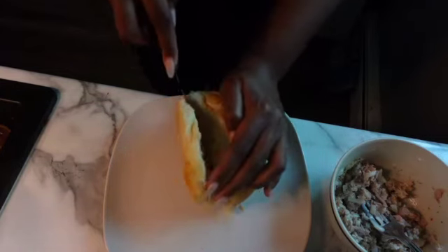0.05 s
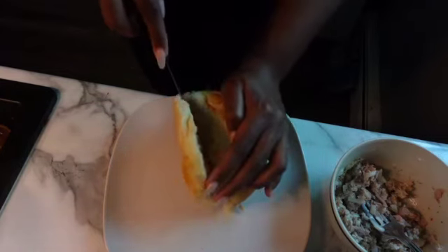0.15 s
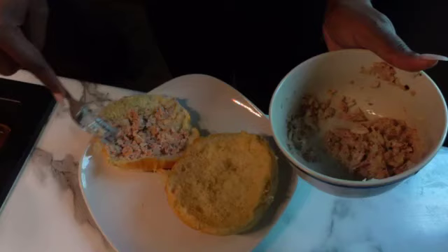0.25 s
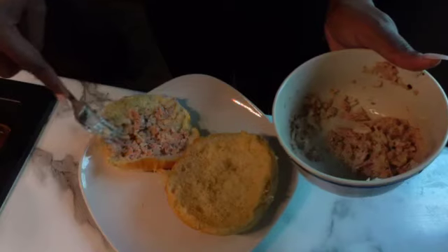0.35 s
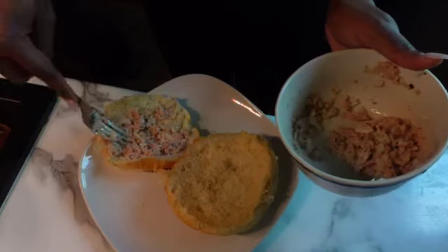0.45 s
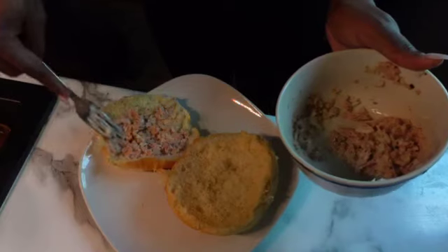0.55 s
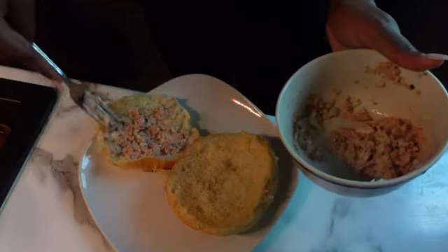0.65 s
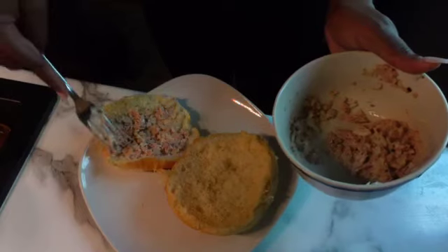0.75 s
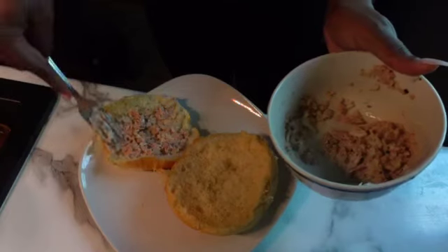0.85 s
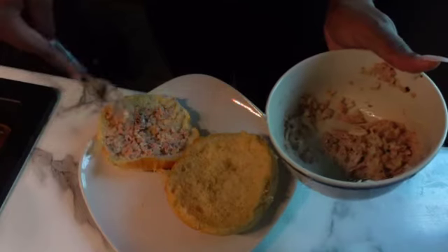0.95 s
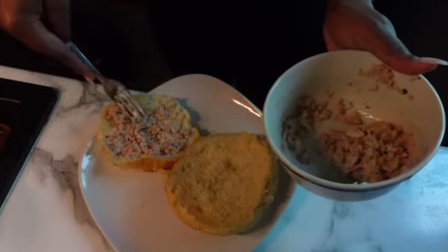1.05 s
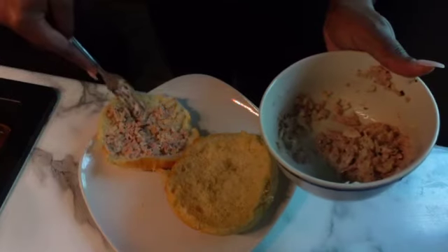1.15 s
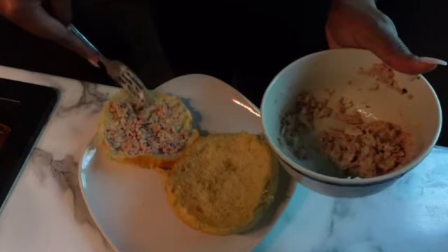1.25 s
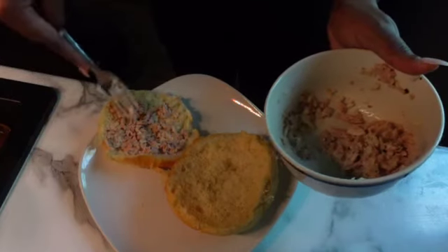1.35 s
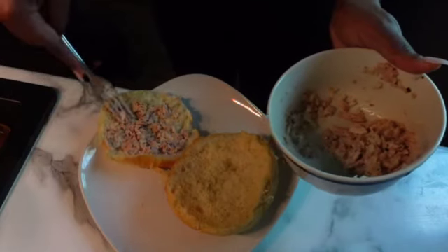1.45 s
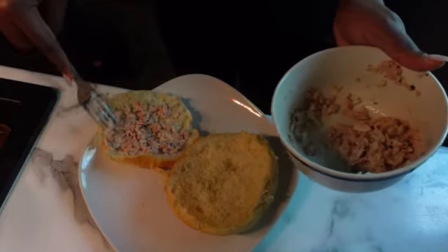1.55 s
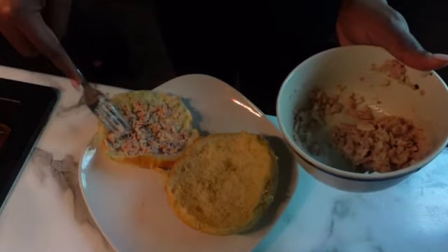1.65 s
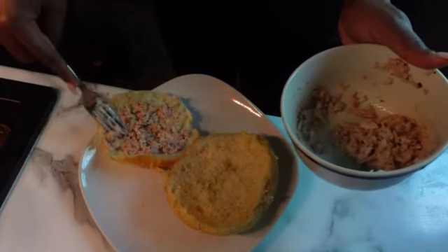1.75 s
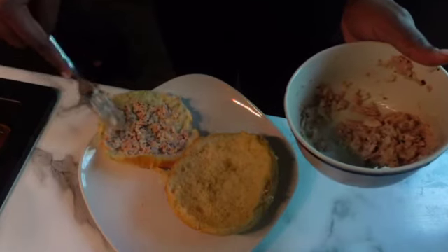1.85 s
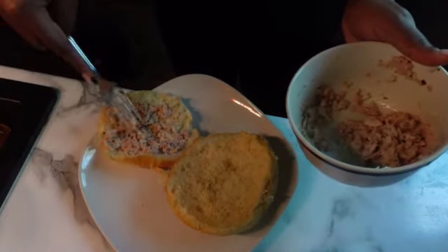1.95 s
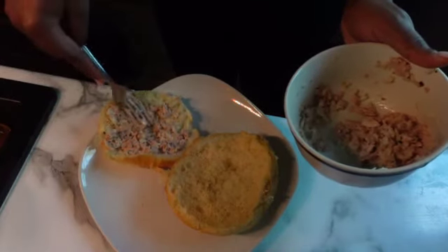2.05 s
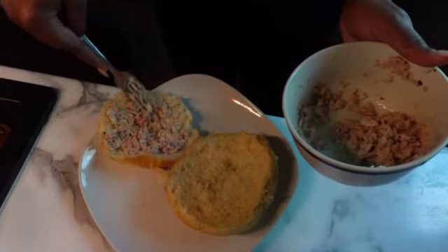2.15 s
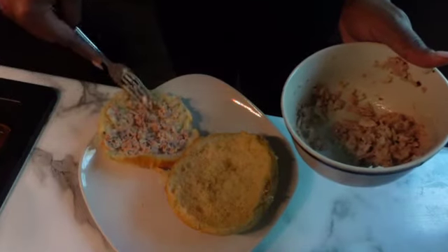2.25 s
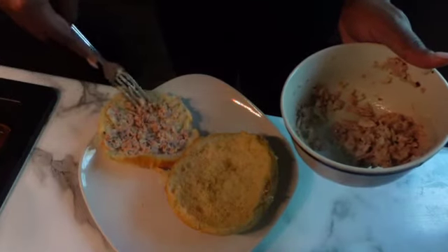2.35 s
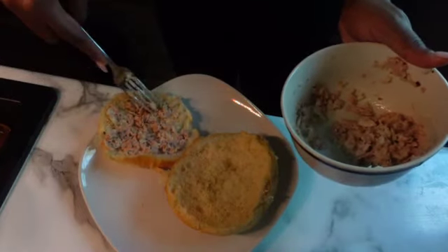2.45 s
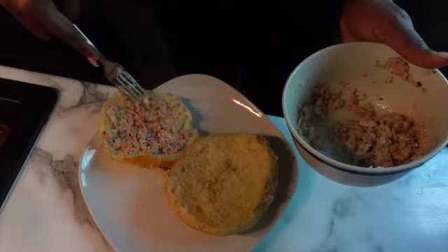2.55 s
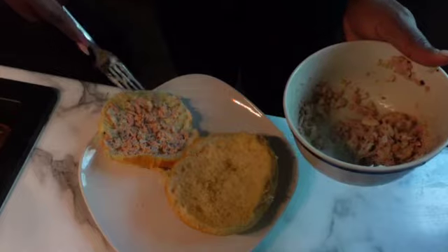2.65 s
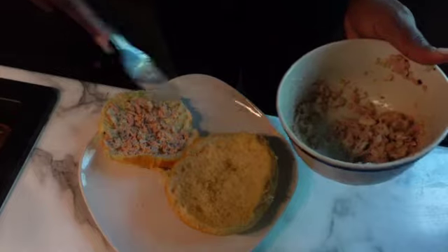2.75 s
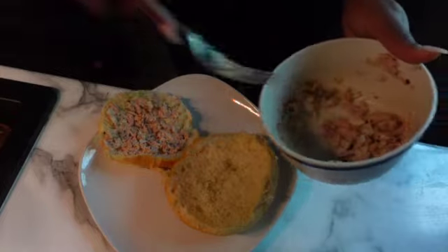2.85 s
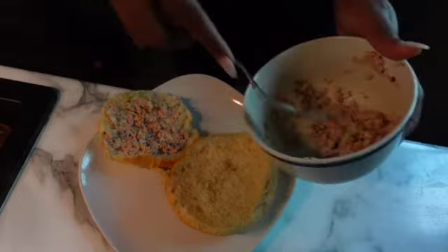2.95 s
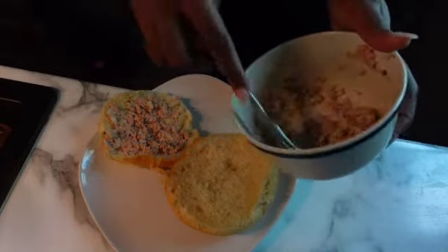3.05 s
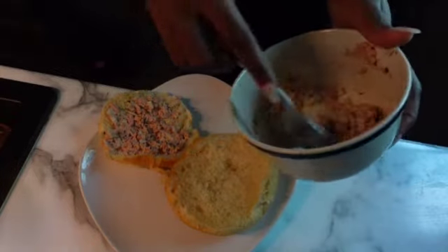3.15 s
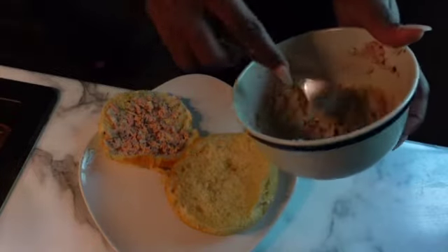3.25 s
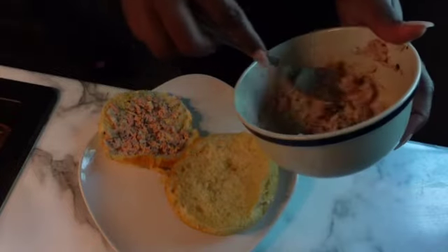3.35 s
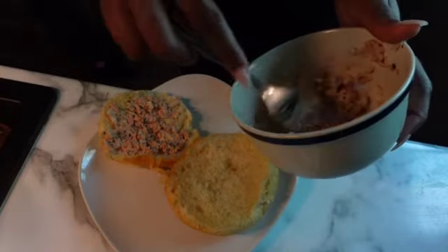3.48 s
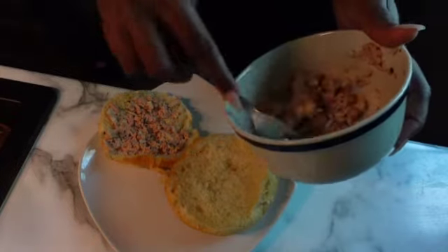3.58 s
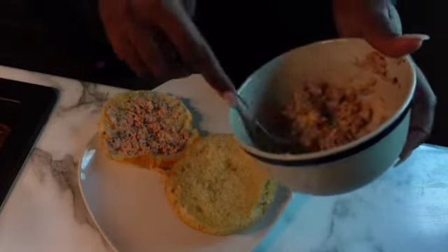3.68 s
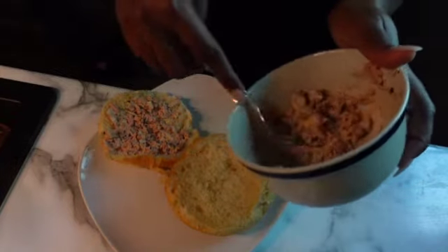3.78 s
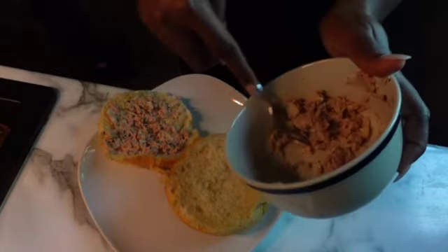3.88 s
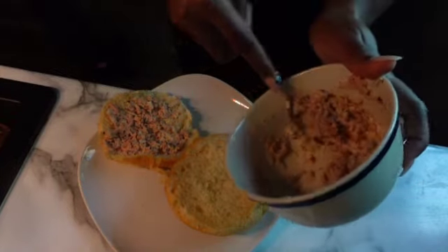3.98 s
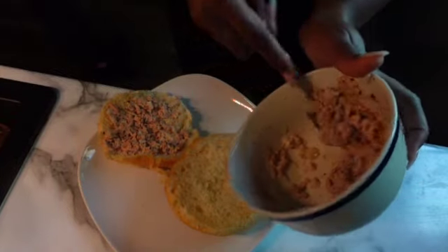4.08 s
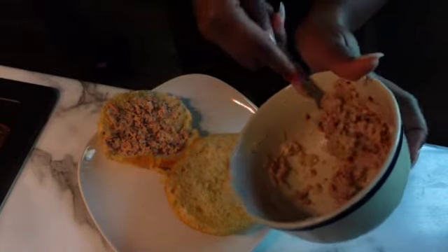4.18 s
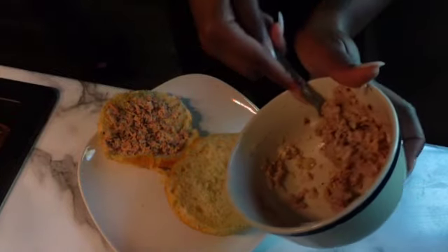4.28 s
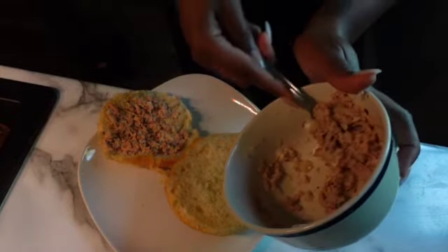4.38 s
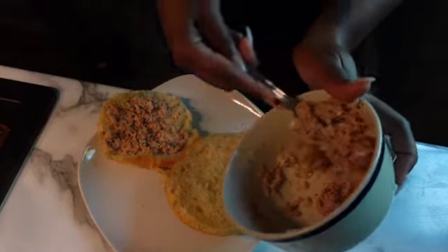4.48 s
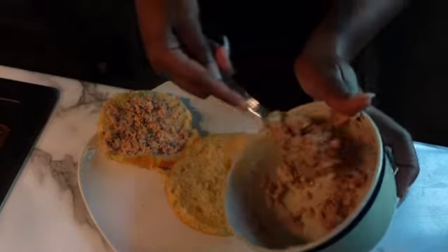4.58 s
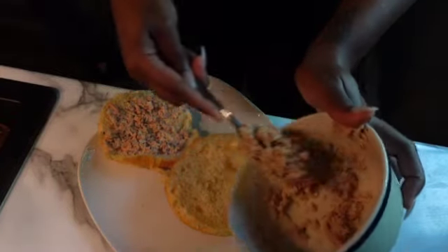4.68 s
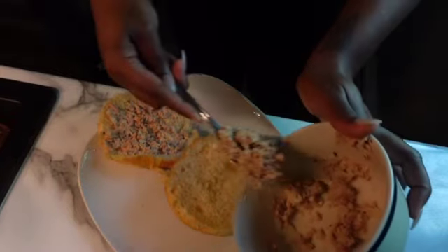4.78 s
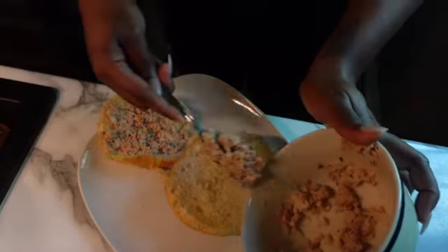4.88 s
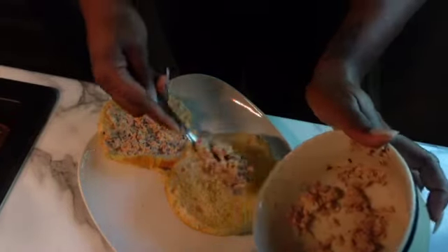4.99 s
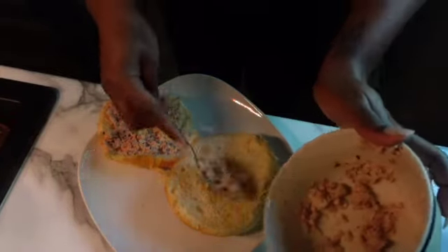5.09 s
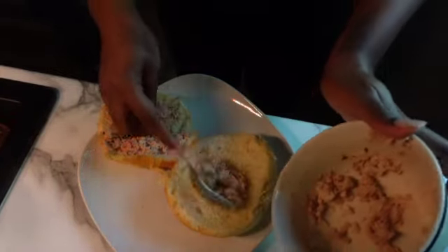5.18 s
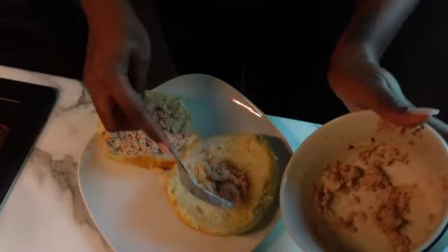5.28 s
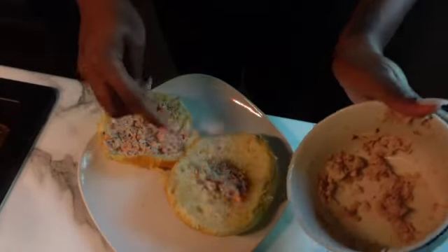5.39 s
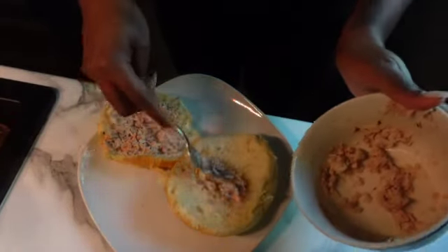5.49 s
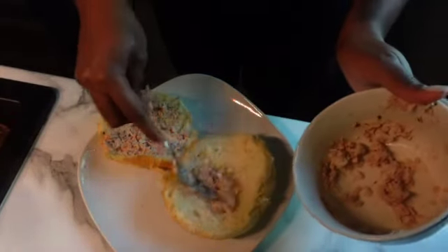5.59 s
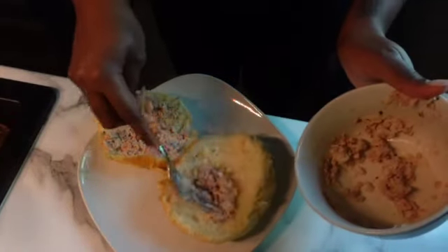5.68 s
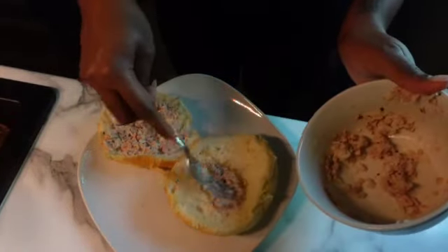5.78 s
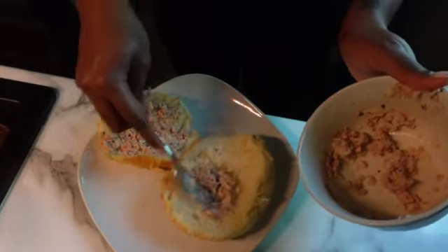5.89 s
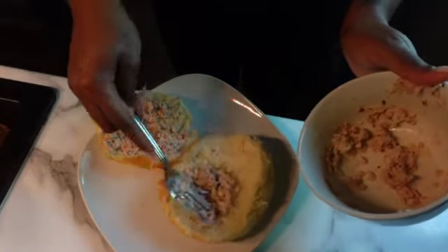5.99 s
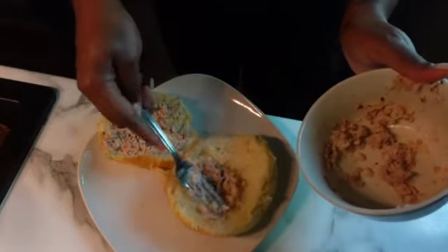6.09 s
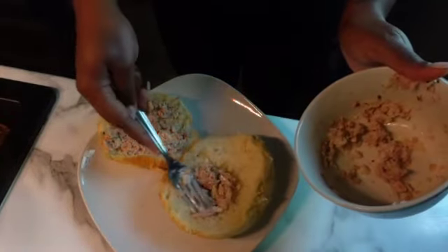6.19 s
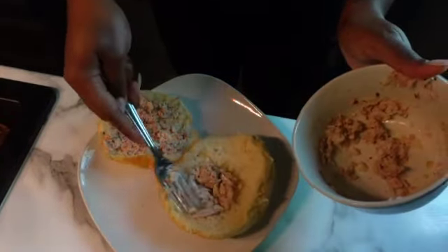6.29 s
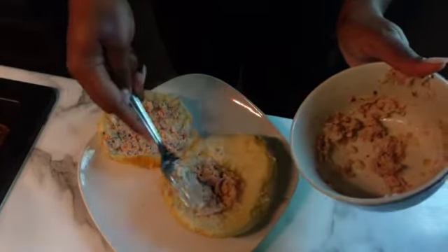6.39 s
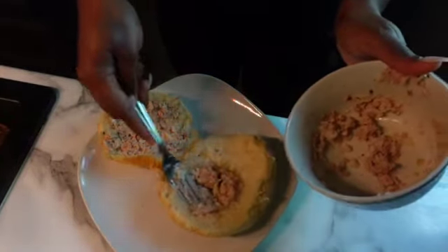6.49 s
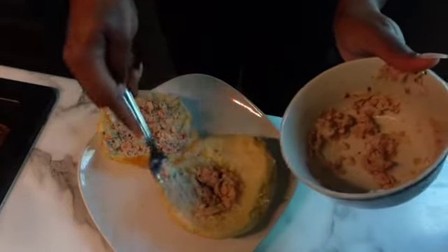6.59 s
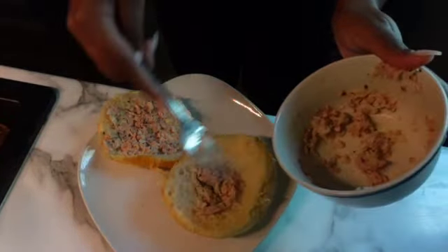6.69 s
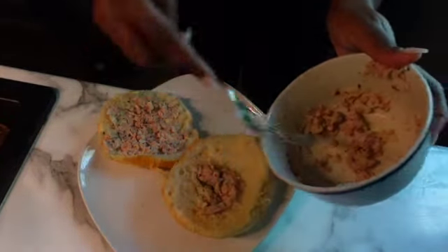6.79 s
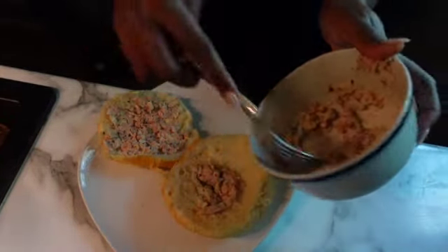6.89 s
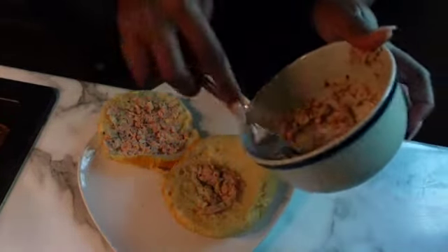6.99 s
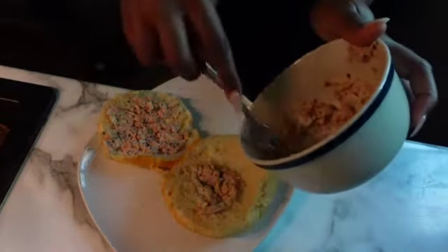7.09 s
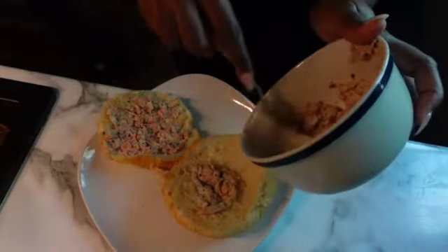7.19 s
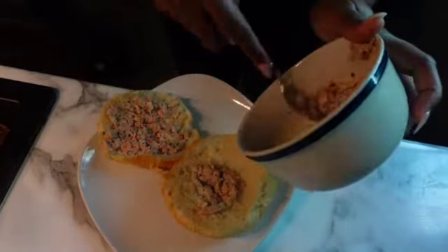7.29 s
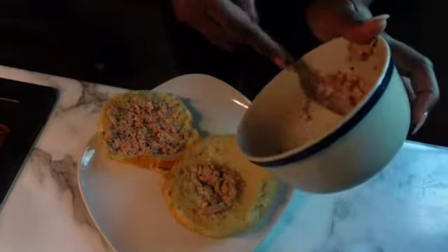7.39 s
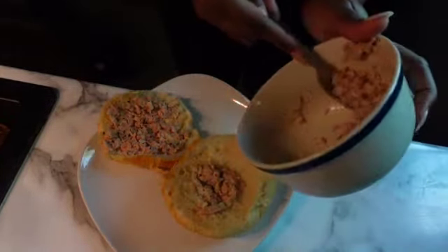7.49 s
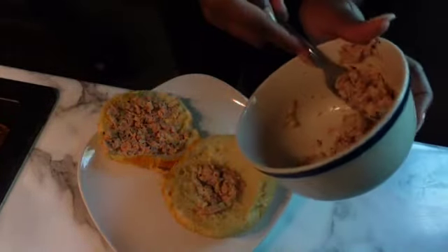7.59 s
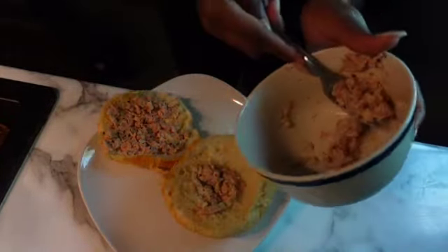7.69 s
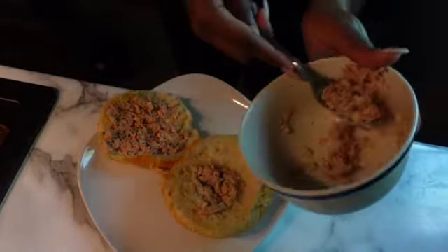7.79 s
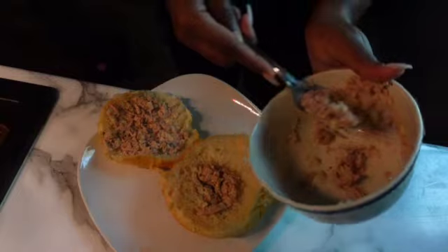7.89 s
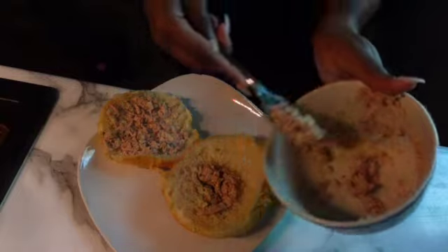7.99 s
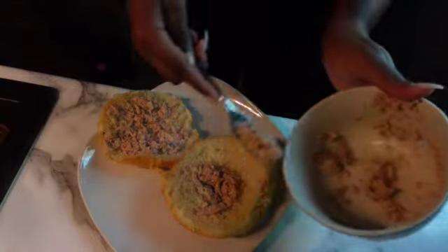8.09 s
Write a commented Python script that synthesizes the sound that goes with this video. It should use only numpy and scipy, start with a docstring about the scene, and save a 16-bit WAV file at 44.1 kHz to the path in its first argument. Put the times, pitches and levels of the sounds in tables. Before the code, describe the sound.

A close kitchen scene over a steady low appliance hum, with a faint whine and soft fan rush. At 0 s a plate rocks on the counter in a very quick run of hard knocks, gone within a tenth of a second, leaving a fine crackling tail. Until 3 s there is little but hum and a few tiny moist ticks. At 3.1 s a metal fork touches a ceramic bowl with bright light clinks, sticky crackles at 3.2-3.4, taps at 3.6-3.8, then a longer swelling scrape to 4.2, ending in a sharp ringing double knock on the rim. From 5.2 to 6.7 s eight soft, dull pats press filling onto the bun, very quiet. At 7.0 s the fork returns: bright gritty scrape, strong ringing clink at 7.16, short scrapes with brief squeaks, final taps near 7.55. Faint moist crackle follows, and hum continues to about 8 s. Light, short room echo.

```python
"""Fork, bowl and bun in a kitchen

A metal fork scoops moist filling from a hand-held ceramic bowl and pats it onto a bun, close by.
A plate rattles on the counter; the fork clinks and scrapes in the bowl in two bouts, as dying sines and as
resonances fed by random slips. Shaped noise makes the crumbs tick and the bun thud softly; tiny pops make the
fading tail of the rattle and the crackle of the filling. An appliance hums throughout, from steady sines and
noise; sparse echoes make the room.
"""
import sys
import numpy as np
from scipy import signal
from scipy.fft import rfft, irfft
from scipy.io import wavfile
from scipy.ndimage import uniform_filter1d

SR = 44100
rng = np.random.default_rng(int(sys.argv[2]) if len(sys.argv) > 2 else 0)


def put_to_file(sound):
    """Save the sound as 16-bit audio at rate SR, in the file named by the first command-line argument."""
    columns = np.atleast_2d(sound).T  # one column per channel
    safe = np.clip(columns, -1, 1)
    whole_steps = np.round(safe * 32767)
    wavfile.write(sys.argv[1], SR, whole_steps.astype(np.int16))


N = 358929
TIME = np.arange(N) / SR
RING = TIME[:SR // 3]  # time axis of one blow, s

# The fork's modes. Each row: frequency in Hz, relative level in dB when struck on its tips,
# relative level in dB when struck on its edge, t60 in s.
TINES = [(2260, -19, -9, .04), (3380, -28, -9, .05), (4657, -26, -7, .045), (5300, -5, -18, .035),
         (5520, -2, -20, .036), (5655, 0, -8, .07), (5790, 1, -10, .04), (5915, -8, -1, .06),
         (6056, -14, -1, .06), (6350, -20, -4, .04), (7892, -19, -4, .07), (8893, -14, -9, .05),
         (10095, -15, 0, .06), (11255, -12, 0, .07), (11915, -18, 0, .06), (12512, -12, 3, .07),
         (13070, -14, -10, .06), (14470, -22, -2, .06), (14905, -17, 1, .06)]
NODE_DB = 2.8  # how far each rubbed mode swells and fades, dB rms


def amp(db):
    """Decibels to gain."""
    return 10 ** (np.asarray(db) / 20)


def evened(x):
    """Scales to an rms of 1."""
    return x / np.sqrt(np.mean(x ** 2) + 1e-20)


def blend(a, b, share):
    """From a (share 0) to b (share 1)."""
    return a + np.clip(share, 0, 1) * (b - a)


def read(points, hz):
    """Reads a curve of (Hz, value) points on a log-frequency axis."""
    f, value = np.transpose(points)
    return np.interp(np.log(hz + 1), np.log(f), value)


def add(mix, s, sound):
    """Lays a sound into the mix at s seconds."""
    part = mix[max(round(s * SR), 0):][:len(sound)]
    part += sound[:len(part)]


def coloured(x, spectrum):
    """Filters x by a spectrum in dB and gives it an rms of 1."""
    hz = np.fft.rfftfreq(x.shape[-1], 1 / SR)
    return evened(irfft(rfft(x) * amp(read(spectrum, hz)), x.shape[-1]))


def wander(size, rate):
    """Smooth chance with an rms of about 1, changing rate times a second."""
    knots = rng.standard_normal(N // 16)
    position = np.arange(size) / SR * rate
    return np.interp(position, np.arange(len(knots)), knots) * np.sqrt(3 / 2)


def pair(a, b, likeness):
    """Two partly alike channels from two unrelated signals."""
    c = np.clip(likeness, 0, 1)
    return np.sqrt((1 + c) / 2) * a + np.sqrt((1 - c) / 2) * np.array([b, -b])


def radiated(x, corner_hz=750):
    """A small rigid thing hardly radiates bass."""
    return signal.sosfilt(signal.butter(N=3, Wn=corner_hz, btype="high", fs=SR, output="sos"), x)


def decay(t60):
    """Exponential fall by 60 dB in t60 seconds."""
    return np.exp(-np.log(1000) * RING / t60)


def ring(modes, rise=.0003):
    """Dying sines, rows (Hz, dB, t60), that build up during the brief contact."""
    sines = sum(amp(db) * decay(t60) * np.sin(2 * np.pi * hz * RING) for hz, db, t60 in modes)
    return radiated(sines * (1 - np.exp(-RING / rise)))


def burst(spectrum, t60):
    """Dense, heavily damped vibration after a blow, as dying coloured noise."""
    return coloured(rng.standard_normal(len(RING)), spectrum) * decay(t60)


def slips(size, per_s, spread_db):
    """Tiny catches at random moments; a few are larger, or smaller if spread_db is negative."""
    sizes = amp(spread_db * np.minimum(rng.exponential(1, size), 4)) * rng.choice([-1, 1], size)
    return evened(sizes * (rng.random(size) < per_s / SR))


def resonate(x, hz, width):
    """A steep resonance that follows the curve hz; rms 1."""
    turn = np.exp(2j * np.pi * np.cumsum(hz) / SR)
    r = np.exp(-np.pi * width / SR)
    # shifted down to 0 Hz, smoothed by a double pole, shifted back
    smoothed = signal.lfilter([1], [1, -2 * r, r * r], x / turn)
    return evened((turn * smoothed).real)


def steadied(x):
    """Friction holds a vibration at an even strength."""
    return x / np.sqrt(abs(uniform_filter1d(x ** 2, size=900)) + 1e-12)


def bowl_modes(rim):
    """The bowl's modes (Hz, dB, t60) for a contact between deep inside (0) and the rim (1)."""
    # The ceramic's resonances. Each row: Hz when touched deep inside, Hz when touched at the rim,
    # relative level in dB deep inside, relative level in dB at the rim, t60 in s.
    resonances = [(1125, 1150, -16, -24, .07), (1830, 1880, -30, -9, .018), (2220, 2293, -26, -2, .028),
                  (2770, 2912, 2.5, -2.5, .08), (2820, 2925, -7, -24, .09), (3480, 3600, -26, -21, .07),
                  (4020, 4156, -28, -11, .05), (4590, 4640, -20, -6, .035), (4790, 4960, -7, -12, .08),
                  (4895, 5080, -1, -3.5, .07), (4950, 5230, -4, -5, .05), (7460, 7560, -19, -10, .03),
                  (10470, 10560, -18, -23, .04), (11860, 11950, -21, -26, .06),
                  (12450, 12570, -20, -22, .08), (13870, 13940, -18, -20, .06)]
    return [(blend(deep_hz, rim_hz, rim), blend(deep_db, rim_db, rim), t60)
            for deep_hz, rim_hz, deep_db, rim_db, t60 in resonances]


def stroke(rise, hold, fall, db, lean_from, lean_to):
    """Pressure swells, holds and fades while the fork rolls over; gives pressure (dB) and lean."""
    light_db = -9.5  # each stroke swells from, and fades to, this light a touch
    settle = 2.08  # the fork rolls over quickly at first, then settles: power of the ease
    corners = np.cumsum([0, rise, hold, fall])
    t = np.arange(0, corners[-1], 1 / SR)
    lean = lean_to + (lean_from - lean_to) * (1 - t / corners[-1]) ** settle
    pressure_db = db + np.interp(t, corners, [light_db, 0, 0, light_db])
    return pressure_db, np.clip(lean, 0, 1)


def rubbed_bowl(drive, rim_from, rim_to, lean, skip, waver_db=2.5):
    """Slips feed the bowl's modes, damped by the tines; gives its lower, upper and top modes."""
    tips_width_hz, flat_width_hz = 26, 99  # the tines damp the modes most when they lie flat
    size = len(drive)
    # the modes glide up as the fork climbs towards the rim
    modes = bowl_modes(np.linspace(rim_from, rim_to, size))
    width = blend(tips_width_hz, flat_width_hz, lean.mean())
    families = []
    for lo, hi in [(0, 3800), (3800, 7000), (7000, SR)]:  # Hz
        # each mode swells and fades as the contact crosses its nodes
        family = sum(amp(db + NODE_DB * wander(size, rate=33.3)) * resonate(drive, hz * skip, width)
                     for hz, db, _ in modes if lo <= hz[0] < hi)
        families.append(steadied(family) * amp(waver_db * wander(size, rate=48.3)))
    return families


def sliding_tines(drive, hz):
    """Each rubbing tine resonates near hz; it drifts, swells and fades as it bears on the glaze."""
    count, width_hz, drift = 4, 170, .032  # drift is a share of the frequency
    size = len(drive)
    return evened(sum(resonate(drive, hz * (1 + drift * wander(size, rate=22)), width_hz)
                      * amp(NODE_DB * wander(size, rate=34.6)) for _ in range(count)))


def scrapes(sing_db=-4, lower_db=-1, upper_db=-4, rub_db=-2.5, squeal_db=-2, grit_db=-5, shimmer_db=-4,
            judder_db=2.0):
    """The tines stick and slip on the glaze; slips feed the bowl's modes and the fork's sliding resonances."""
    # Strokes of the fork round the bowl. Lean runs from 0 (on the tips of the tines) to 1 (flat on its side).
    # Each row: start, rise, hold and fall in seconds, pressure in dB, lean at start, lean at end,
    # extra squeal in dB, ratio of the fork's two resonances, extra dB on the bowl's lower modes,
    # extra dB on its upper modes, nearness to the rim (0-1) at start, the same at end.
    strokes = [(3.706, 0.011, 0.034, 0.029, -20, 0, 0, 28.5, 1.9, -14, -11, 0, 0),
               (3.816, 0.26, 0.034, 0.089, -1, 0.67, 0.86, -6, 2.42, 0.5, -0.5, 0.15, 0.58),
               (7.002, 0.018, 0.048, 0.14, 2.5, 0.021, 0.34, -4, 2, -1.5, -0.5, 0.01, 0.032),
               (7.161, 0.0075, 0.025, 0.094, 2.5, 0.41, 0.64, -9, 1.66, 3, 2.5, 0.06, 0.44),
               (7.25, 0.036, 0.051, 0.063, 0.5, 0.92, 0.95, 0, 1.8, 1, 0.5, 0.06, 0.27),
               (7.406, 0.03, 0.088, 0.093, -3, 0.87, 0.82, -3, 1.73, 1, -1.5, 0.24, 0.54)]
    # The grit of metal on glaze. Each row: frequency in Hz, relative level in dB.
    grit_colour = [(200, -38), (600, -16), (1100, -3), (2200, -8), (3500, -4), (6000, -3), (8800, -3),
                   (10500, 1), (13000, 1), (16000, -3)]
    # The fork's dull rubbing. Each row: frequency in Hz, relative level in dB.
    rub_colour = [(200, -28), (500, -10), (900, 0), (1500, 4), (2400, -4), (3300, 3), (4400, 0), (5500, -3),
                  (9000, -13), (16000, -25)]
    # what a stroke feeds: (dB on the tips, dB flat on the side)
    feeds = [(-30.5, -38),    # the bowl's lower modes
             (-22.5, -38.5),  # the bowl's upper modes
             (-48, -33),      # rub of the sliding fork
             (-42.5, -59.5),  # squeal of the tines
             (-29.5, -53.5)]  # grit, and the bowl's top modes
    tips_hz, flat_hz = 3183, 1649  # the fork's lower resonance sinks as it leans
    skip_share = 0.0039  # the skipping tines shake the pitch by this share

    out = np.zeros(N)
    dense_modes = burst(grit_colour, t60=.06)
    for (start, *gesture, extra_squeal_db, ratio, extra_low_db, extra_high_db,
         rim_from, rim_to) in strokes:
        pressure_db, lean = stroke(*gesture)
        size = len(lean)
        low, high, rub, squeal, grit = (amp(pressure_db + blend(tips, flat, lean)) for tips, flat in feeds)
        drive = slips(size, per_s=4000, spread_db=3.5)
        skip = 1 + skip_share * wander(size, rate=60.2)

        lower_modes, upper_modes, top_modes = rubbed_bowl(drive, rim_from, rim_to, lean, skip)
        bowl = amp(extra_low_db) * low * lower_modes
        bowl += amp(extra_high_db) * high * upper_modes
        bowl += amp(sing_db) * grit * top_modes

        slide_hz = tips_hz * (flat_hz / tips_hz) ** lean
        fork = amp(lower_db) * sliding_tines(drive, slide_hz)
        fork += amp(upper_db) * sliding_tines(drive, ratio * slide_hz)
        fork += amp(rub_db) * coloured(drive, rub_colour)

        # dragged on their tips, the tines squeal on their own modes
        tines = sum(amp(db) * resonate(drive, hz * skip, width=80) for hz, db, _, _ in TINES)
        tines = amp(squeal_db + extra_squeal_db) * evened(tines)

        shimmer = steadied(signal.fftconvolve(drive, dense_modes)[:size])
        glaze = amp(grit_db) * coloured(drive, grit_colour) + amp(shimmer_db) * shimmer
        glaze = signal.lfilter(*signal.butter(N=1, Wn=3200, btype="high", fs=SR), glaze)

        judder = amp(judder_db * wander(size, rate=160))  # the hand's pressure is uneven
        friction = (rub * fork + squeal * tines + grit * glaze) * judder
        add(out, start, (bowl + friction) * signal.windows.tukey(size, .03))
    return out


def squeaks(waver=0.0056, overtone_db=-24):
    """For a moment the stick and slip locks onto one mode, which sings out almost pure."""
    # Brief squeaks of the tines on the glaze. Each row: start in seconds, length in seconds,
    # frequency in Hz, level in dB.
    squeak_list = [(3.164, 0.047, 2770, -47), (3.695, 0.01, 4870, -24), (3.73, .022, 12200, -39),
                   (3.916, .024, 2795, -30.5), (3.939, 0.033, 2800, -28.5), (7.086, 0.013, 4870, -19),
                   (7.21, 0.013, 4980, -17.5), (7.234, .007, 4990, -22), (7.24, 0.0061, 4970, -20),
                   (7.336, 0.02, 2814, -24.5), (7.41, 0.033, 4910, -28)]
    out = np.zeros(N)
    for s, length, hz, db in squeak_list:
        size = round(length * SR)
        phase = 2 * np.pi * np.cumsum(hz * (1 + waver * wander(size, rate=170))) / SR
        tone = np.sin(phase) + amp(overtone_db) * np.sin(2 * phase)
        add(out, s, amp(db) * signal.windows.tukey(size, .7) * tone)
    return out


def clinks():
    """Each blow rings bowl and tines; the place of contact weights and detunes the bowl's modes."""
    # Fork hitting the bowl. Each row: start in seconds, bowl in dB, tines in dB, bright snap in dB,
    # nearness to the rim (0-1), part of the fork that hits (tips 0 to edge 1).
    blows = [(3.114, -59, -32, -26, .2, 1), (3.162, -54.5, -47, -39, 0.1, .6),
             (3.604, -72, -24.5, -41, .9, 0.12), (3.6071, -58, -29, -36, 0.6, 0),
             (3.679, -62, -29, -36, 0.7, 0), (3.699, -38, -28, -41, 0.4, 0), (3.794, -52, -35, -31, .1, 0),
             (3.8015, -21.5, -25, -34, .14, 0), (3.804, -37, -25, -43, 0.1, 0),
             (3.856, -54, -49, -58.5, 0.4, 0.17), (4.056, -30, -52, -50, .67, .5),
             (4.159, -29, -51, -47, 0.57, 0.22), (4.2055, -15.5, -38, -37, 1, .7),
             (4.20825, -15.5, -42, -35.5, 1, .7), (7.002, -29, -26, -20, 0.04, 0.43),
             (7.052, -46, -31, -24, 0.1, 0.34), (7.163, -14.5, -46, -42, 0.18, 0.35),
             (7.2977, -20.5, -49, -50, .45, 0.34), (7.341, -26, -50, -42, 0.26, .5),
             (7.4143, -38, -42, -39, 0.36, 0.33), (7.4667, -28, -44, -38, 0.65, .5),
             (7.551, -28.5, -41, -52, 0.6, 0)]
    # Fork bottoming dully through the filling. Each row: start in seconds, level in dB.
    bumps = [(3.603, -33), (3.608, -34), (3.68, -44)]
    # Tips of the tines ticking on the glaze, damped by the filling.
    # Each row: start in seconds, frequency in Hz, level in dB.
    ticks = [(3.248, 3700, -31), (3.33, 3970, -37), (3.33, 7500, -36), (3.342, 4160, -26),
             (3.3465, 3700, -27.5), (3.355, 5700, -30), (3.41, 4600, -36), (3.857, 6200, -25),
             (3.857, 7250, -27), (4.056, 3000, -17), (4.16, 3030, -17), (7.4666, 4600, -18),
             (7.552, 2600, -24)]
    # Bright snap of the contact. Each row: frequency in Hz, relative level in dB.
    snap_colour = [(200, -57), (800, -9.5), (2000, -9), (4500, -8), (6200, 0), (9200, -10.5), (10500, 4.5),
                   (12500, -2.5), (15500, 1)]
    # Dull knock of the contact. Each row: frequency in Hz, relative level in dB.
    knock_colour = [(50, -32), (170, -5), (400, 10.5), (620, 5.5), (850, 14.5), (1200, -49), (2300, -31),
                    (5000, -34), (12000, -41)]
    # Crack of the bowl under a blow. Each row: frequency in Hz, relative level in dB.
    crack_colour = [(200, -53), (700, -19.5), (1250, -27), (1950, -1.5), (2900, 8), (3600, -13), (5000, 4),
                    (6500, -7.5), (9000, -18), (16000, -31)]

    out = np.zeros(N)
    for s, bowl_db, tine_db, snap_db, rim, edge in blows:
        fork = ring([(hz, blend(tips_db, edge_db, edge), t60) for hz, tips_db, edge_db, t60 in TINES])
        bowl = ring(bowl_modes(rim))
        bowl += amp(-7) * radiated(burst(crack_colour, t60=.045), corner_hz=1100)
        bowl += amp(-28.5) * burst(knock_colour, t60=0.048)
        snap = burst(snap_colour, t60=0.089)
        add(out, s, amp(bowl_db) * bowl + amp(tine_db) * fork + amp(snap_db) * snap)
    for s, db in bumps:
        add(out, s, amp(db) * burst(knock_colour, t60=0.054))
    for s, hz, db in ticks:
        add(out, s, amp(db) * ring([(hz, 0, 0.0095)]))
    return out


def plate(clack_db=-7, ring_db=-1.5, rise=0.00076):
    """The plate rocks on its foot on the counter in a quick run of knocks; the last, near the rim, rings higher."""
    # Knocks of the rocking plate. Each row: start in seconds, level in dB, nearness to the rim (0-1).
    rattle = [(.001, -23, 0), (.0092, -24, 0.1), (0.0172, -18, 0.06), (0.0323, -18, 0.04),
              (.0362, -12.5, 0.02), (.0410, -19, 0.36), (.056, -22, 1)]
    # The plate's modes. Each row: frequency in Hz, relative level in dB when knocked on its foot,
    # relative level in dB at the rim, t60 in s.
    plate_modes = [(1050, -7, -22, .03), (1225, 1, -14, .035), (1315, -3, 0, .11), (1475, 5, -14, .04),
                   (1590, -6, -12, .035), (2283, -15, 2, .09), (2450, -15, -20, .04), (4020, -21, -15, .07),
                   (4490, -25, -19, .13), (5320, -19, -15, .3), (6380, -19, -24, .05),
                   (6885, -29, -23, .12), (8590, -31, -16, .2)]
    # Hard clack of the contact. Each row: frequency in Hz, relative level in dB.
    clack_colour = [(150, -62), (600, -32), (950, -1), (1350, 8.5), (1900, -7), (2400, -5), (3200, -20),
                    (6300, -24), (10000, -29), (16000, -37)]
    out = np.zeros(N)
    for s, db, rim in rattle:
        modes = [(hz, blend(foot_db, rim_db, rim), t60) for hz, foot_db, rim_db, t60 in plate_modes]
        body = radiated(ring(modes, rise=.0008), corner_hz=880)
        clack = radiated(radiated(burst(clack_colour, t60=.05)), corner_hz=1000)
        clack *= 1 - np.exp(-RING / rise)
        add(out, s, amp(db) * (amp(ring_db) * body + amp(clack_db) * clack))
    return out


def crackle_and_crumbs():
    """Tiny pops swell as the plate's fading tail, then as pushed moist filling; it ticks where it pulls apart."""
    # Swells of fine crackling noise; the first is the fading tail of the plate's rattle, the others
    # pushes through the filling. Each row: peak in seconds, half-width in seconds, level in dB.
    swells = [(0, 0.16, -44), (3.2, 0.084, -55.5), (3.35, 0.1, -52.5), (4.45, 0.17, -69),
              (5.66, 0.034, -60), (5.92, 0.19, -66), (7.678, 0.11, -54.5)]
    # Ticks of sticky food parting. Each row: start in seconds, level in dB, brightness in dB per octave.
    crumbs = [(.319, -45, 13), (1.5388, -48, 13), (1.5687, -49, 17), (2.3, -53, 3), (2.541, -42, 15),
              (3.346, -33, 5), (3.353, -35, 5), (3.407, -40, 4), (4.453, -47, -1), (5.945, -51.5, 0),
              (5.995, -62, -5), (7.736, -46, 14)]
    # Colour of the crackle and ticks. Each row: frequency in Hz, relative level in dB.
    crackle_colour = [(200, -45), (700, -11.5), (1800, 4), (3800, 5.5), (7000, 1), (11000, -1.5),
                      (16000, -10.5)]
    stir_db = -69  # the filling is never quite still
    # more ticks fall at random: how many, level and its spread (dB), brightness (dB per octave)
    stray_count, stray_db, stray_spread_db, stray_tilt = 16, -52.5, 3, 6

    # each tiny pop has one of twelve pitches and dies almost at once
    pops = np.zeros(N)
    for hz in np.linspace(1500, 15500, num=12):
        pop = np.sin(2 * np.pi * hz * RING[:200]) * np.exp(-RING[:200] / 0.000073)
        pops += signal.oaconvolve(slips(N, per_s=120, spread_db=-1.5), pop)[:N]
    level = amp(stir_db) + sum(amp(db) * np.exp(-((TIME - s) / width) ** 2) for s, width, db in swells)
    out = level * coloured(pops, crackle_colour)

    strays = [(rng.uniform(0, N / SR), rng.normal(stray_db, stray_spread_db), stray_tilt)
              for _ in range(stray_count)]
    for s, db, tilt in crumbs + strays:
        colour = [(hz, colour_db + tilt * np.log2(hz)) for hz, colour_db in crackle_colour]
        add(out, s, amp(db) * burst(colour, t60=0.021))
    return out


def pats(rise=0.0052):
    """Soft pushes through the bun thud in the plate and counter."""
    # Fork patting the bun. Each row: start in seconds, level in dB.
    pat_list = [(5.244, -38), (5.702, -37.5), (5.857, -37), (5.983, -40.5), (6.162, -41), (6.249, -37),
                (6.584, -34.5), (6.71, -37)]
    # Colour of the thud. Each row: frequency in Hz, relative level in dB.
    thud_colour = [(30, -35), (70, -22), (140, -2), (220, -2.5), (400, -15), (900, -50.5)]
    out = np.zeros(N)
    for s, db in pat_list:
        add(out, s, amp(db) * burst(thud_colour, t60=0.091) * (1 - np.exp(-RING / rise)))
    return out


def appliance(waver_db=0.03, whine_hz=2064, drone_db=-52.0, air_db=-61.5):
    """A motor hums, drones and whines faintly over the rush of its fan."""
    # Steady tones of the motor. Each row: frequency in Hz, rms level in dB.
    hum_tones = [(187.4, -67), (280.9, -48), (374.6, -71.5), (473.7, -71), (1184, -75), (3666, -79),
                 (4200, -81), (6212, -79.5), (8080, -81)]
    # Strength of the whine over time. Each row: time in seconds, rms level in dB.
    whine_curve = [(0, -74), (.3, -75.5), (1.7, -72), (2.0, -69.5), (3.0, -70.5), (3.2, -81), (8.14, -72)]
    # Colour of the fan's rush. Each row: frequency in Hz, relative level in dB.
    air_colour = [(350, -20), (600, -6), (812, 2.5), (1010, -7), (1210, -1), (1430, -4.5), (1850, -7),
                  (2010, -4), (2310, -12), (4110, -13), (5190, -12.5), (6120, -12.5), (16000, -37)]
    # Colour of the low drone. Each row: frequency in Hz, relative level in dB.
    drone_colour = [(30, -42), (45, -23.5), (58, -14.5), (80, -17.5), (125, -12.5), (200, -4.5), (300, 2.5),
                    (400, -4.5), (520, -7.5), (700, -18.5), (1100, -33.5)]

    hum = np.zeros(N)
    for hz, db in hum_tones:
        level = amp(db + waver_db * wander(N, rate=14))
        hum += level * np.sin(2 * np.pi * hz * TIME + 0.07 * wander(N, rate=14))
    whine = np.sin(2 * np.pi * whine_hz * TIME + 0.6 * wander(N, rate=20))
    whine *= amp(np.interp(TIME, *np.transpose(whine_curve)))
    motor = np.sqrt(2) * (hum + whine) * amp([[.25], [-.25]])  # a touch to the left
    drone = pair(*coloured(rng.standard_normal((2, N)), drone_colour), likeness=0.85)
    air = pair(*coloured(rng.standard_normal((2, N)), air_colour), likeness=0.69)
    return motor + amp(drone_db) * drone + amp(air_db) * air


def kitchen(x, wet_db, build=0.013):
    """Sparse reflections build up and die away, the highest treble first and the bass last."""
    # Decay of the room. Each row: frequency in Hz, t60 in s.
    room_decay = [(150, 1), (1200, 0.45), (3000, 0.41), (5000, 0.42), (9000, 0.48), (15000, 0.055)]
    taps = rng.choice([-1., 1.], (2, SR)) * (rng.random((2, SR)) < 4000 / SR)
    hz, t, z = signal.stft(taps, SR, nperseg=256)
    fading = np.exp(-np.log(1000) * t / read(room_decay, hz)[:, None])
    tail = signal.istft(z * fading, SR, nperseg=256)[1][:, :SR]
    tail = tail * (1 - np.exp(-TIME[:SR] / build))
    tail = pair(*tail / np.linalg.norm(tail[0]), likeness=.65)
    return x + amp(wet_db) * signal.fftconvolve(x[None], tail, axes=1)[:, :N]


def scene():
    """The bowl is held slightly to the right of the plate, with the appliance behind."""
    fork_in_bowl = radiated(clinks() + scrapes() + squeaks(), corner_hz=130)
    bowl = kitchen(fork_in_bowl, wet_db=-13.5) * amp([[-.3], [.3]])
    crockery = kitchen(plate(), wet_db=-17.5)
    soft_sounds = kitchen(crackle_and_crumbs() + pats(), wet_db=-15.5)
    return bowl + crockery + soft_sounds + appliance()


def record(dry):
    """The recorder's band limit: a steep low-pass."""
    edge_hz = 15950
    low_pass = signal.firwin(511, edge_hz, window=("kaiser", 9), fs=SR)
    return signal.oaconvolve(dry, low_pass[None], "same")


dry = scene()
out = record(dry)
put_to_file(out)
```